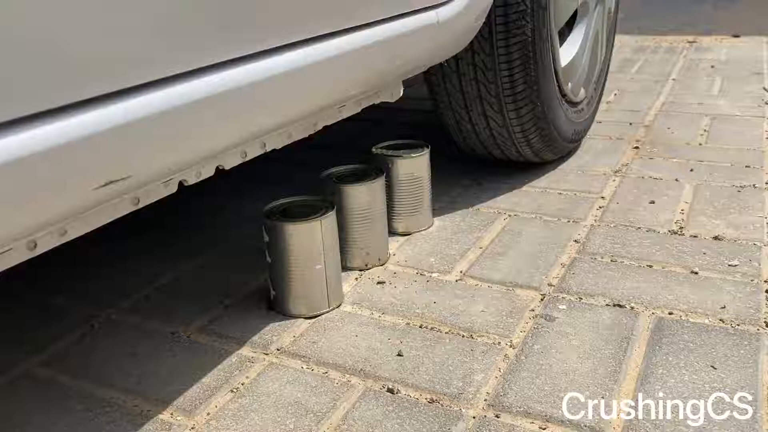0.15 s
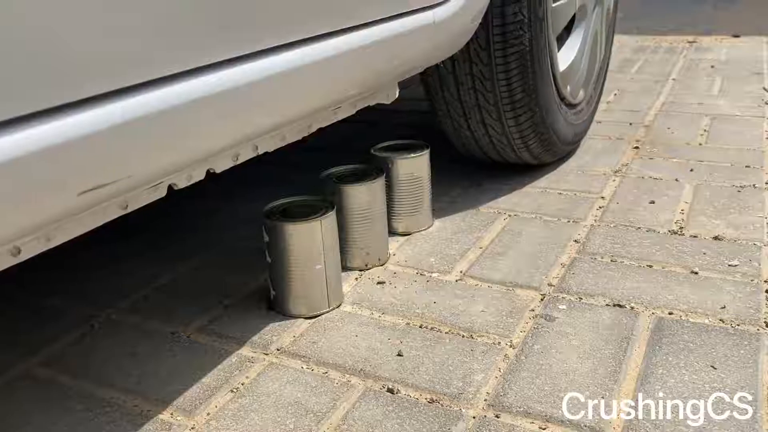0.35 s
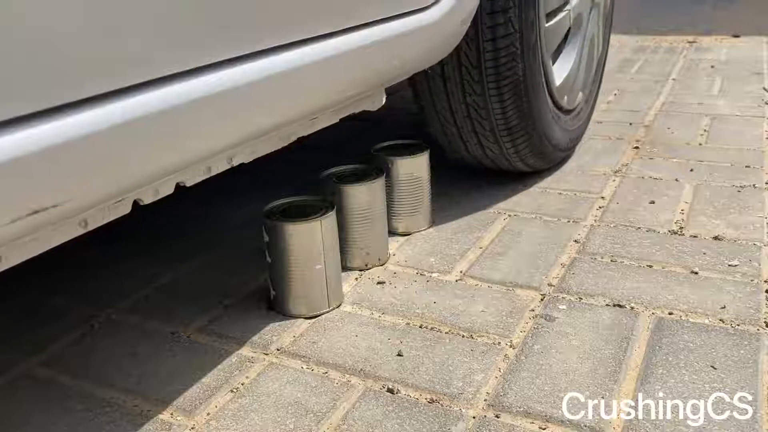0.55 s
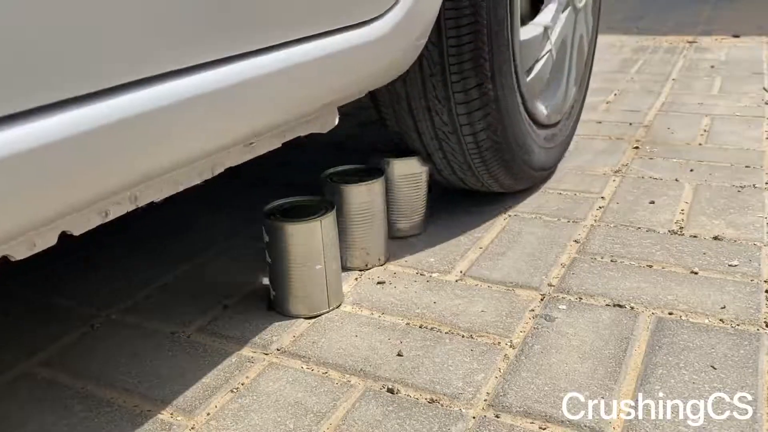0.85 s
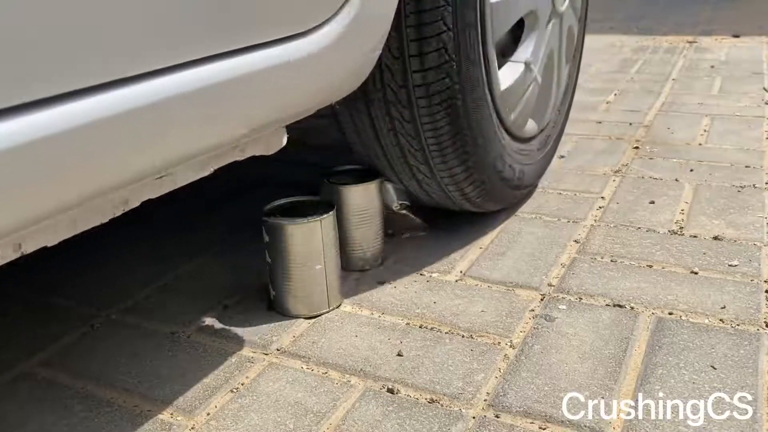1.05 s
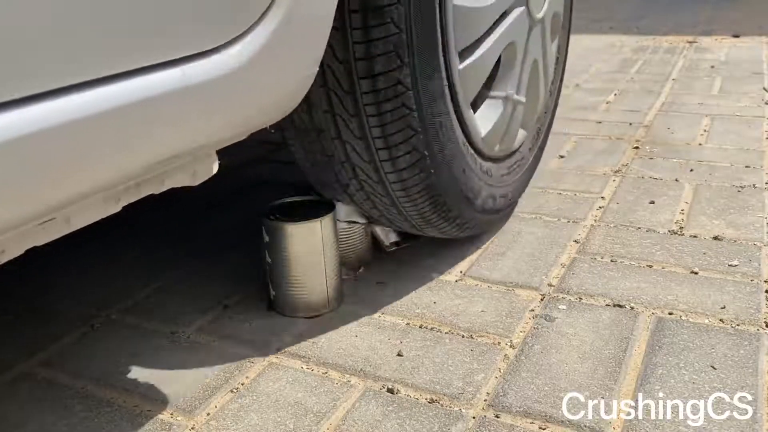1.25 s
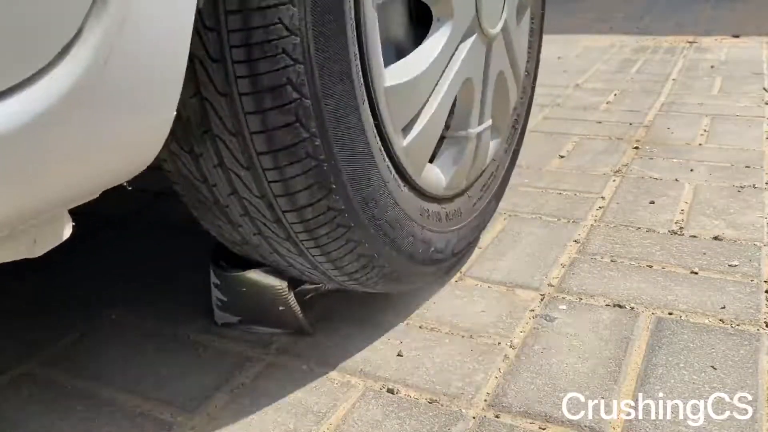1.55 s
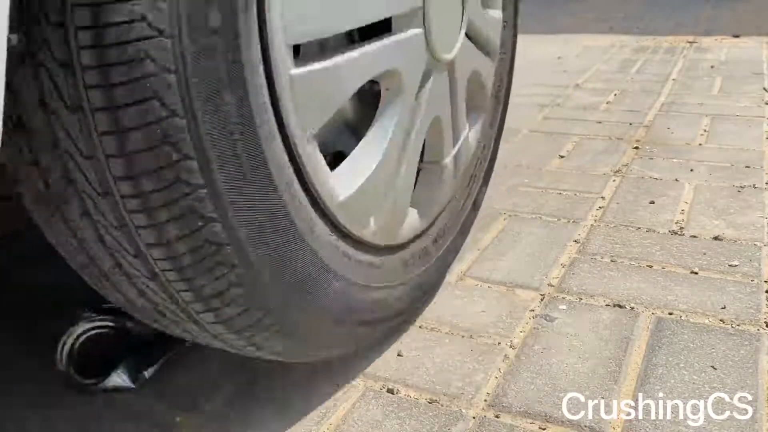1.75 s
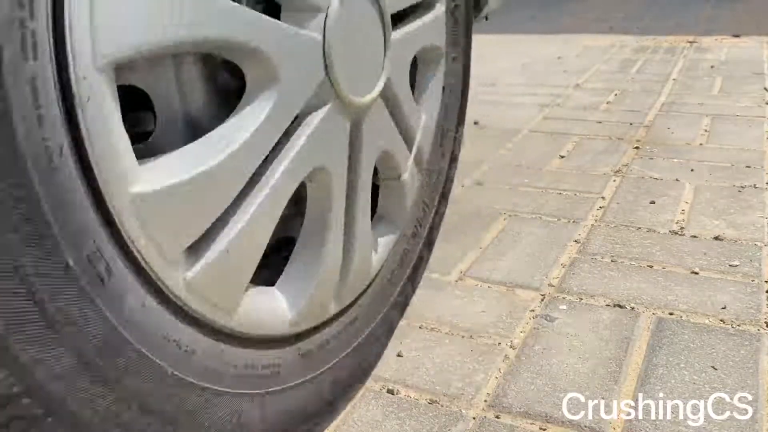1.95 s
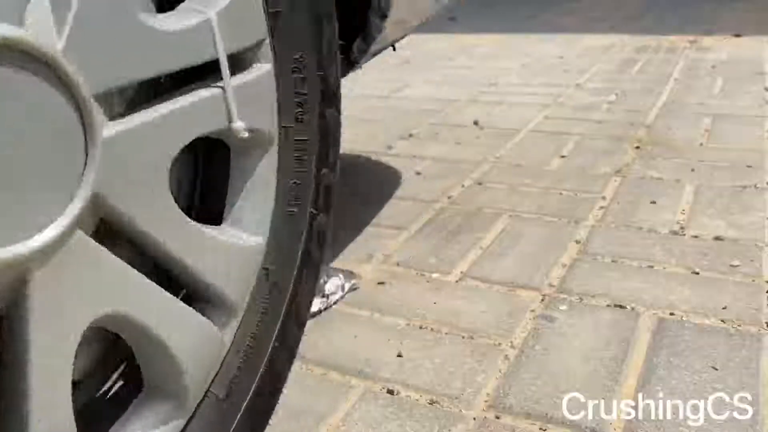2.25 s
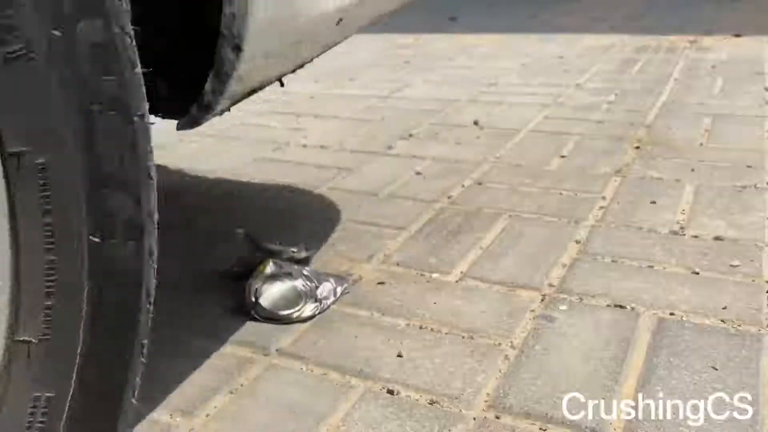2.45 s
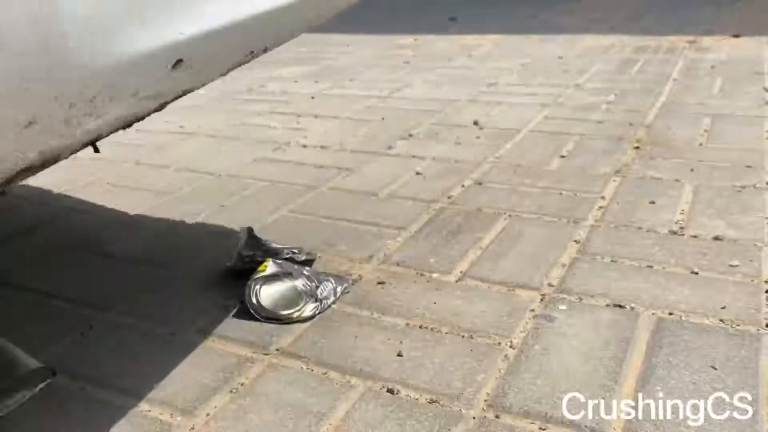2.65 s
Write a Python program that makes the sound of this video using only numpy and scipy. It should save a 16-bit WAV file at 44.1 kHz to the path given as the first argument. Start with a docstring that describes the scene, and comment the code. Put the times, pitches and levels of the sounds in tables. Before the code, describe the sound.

Close, dry outdoor stereo pickup of metal cans flattened under a tyre: engine rumble first, two hollow cracks, crackling crumple in two surges, brief metal groan, then small slaps and rattles as the rumble recedes.

```python
"""Empty tins crack, crunch, groan and clatter under a creeping car's tyre, over rumble that moves away.
Two collapse with a noise crack and a falling sine thump; snapping folds are struck modes and noise puffs.
Random grains ringing a shell make the crumpling, fluttering partials the groan, filtered noise the boom.
Flattened tins slap the paving as struck modes; the car is shaped noise and a wavering hum.
A short tail of decaying noise adds echoes, and a two-port microphone colours the whole."""
import sys
import numpy as np
from scipy import signal
from scipy.fft import rfft, irfft
from scipy.io import wavfile
from scipy.ndimage import uniform_filter1d

SR = 44100
rng = np.random.default_rng(int(sys.argv[2]) if len(sys.argv) > 2 else 0)


def unload_wav(signal):
    """Save mono or channel-first audio to the path in sys.argv[1] as 16-bit WAV at rate SR, clipped to [-1, 1]."""
    wavfile.write(
        sys.argv[1],
        SR,
        np.round(np.clip(np.atleast_2d(signal).T, -1, 1) * 32767).astype(np.int16),
    )


N = 123479
TIME_S = np.arange(N) / SR

# Low thud of a struck panel: (frequency [Hz], density [dB per Hz])
KNOCK_SPECTRUM = [(100, -31), (300, -11), (550, -1.5), (1100, 4.5), (1600, -5.5), (2600, -34), (6000, -64)]
# Mid-treble snap of sheet metal: (frequency [Hz], density [dB per Hz])
SNAP_SPECTRUM = [(600, -13), (1500, 1), (2500, 3), (3600, 0), (5500, -40), (12000, -68)]
# High fizz of sheet metal: (frequency [Hz], density [dB per Hz])
FIZZ_SPECTRUM = [(2000, -52), (4200, 0.5), (6000, 1), (8000, -1.5), (11000, -9), (16000, -17)]


def amp(db):
    """Decibels to gain."""
    return 10 ** (np.asarray(db) / 20)


def unit(x):
    """Scales to an rms of 1."""
    return x / np.sqrt(np.mean(x ** 2) + 1e-20)


def read(points, hz):
    """Interpolates a table along a log-frequency axis."""
    f, value = np.transpose(points)
    return np.interp(np.log(hz + 1), np.log(f + 1), value)


def curve(rows):
    """Interpolates every column of a timed table, sample by sample."""
    time_s, *columns = np.transpose(rows)
    return [np.interp(TIME_S, time_s, column) for column in columns]


def add(mix, time_s, sound):
    """Adds a stereo sound to the mix in place, cut at its end."""
    part = mix[:, round(time_s * SR):][:, :sound.shape[1]]
    part += sound[:, :part.shape[1]]


def pan(db):
    """Gains of the left and right port for a left-right difference."""
    return amp([[db / 2], [-db / 2]])


def colour(x, spectrum):
    """Gives two unrelated signals a spectrum and the likeness of the two ports; rms 1."""
    # Likeness of the ports: (frequency [Hz], correlation [-1 to 1])
    likeness = [(30, .72), (120, .76), (300, .84), (700, .9), (1400, .82), (3000, .58), (7000, .2),
                (15000, 0)]
    size = x.shape[1]
    hz = np.fft.rfftfreq(size, 1 / SR)
    left, other = rfft(x)
    same = np.clip(read(likeness, hz), -1, 1)
    right = same * left + np.sqrt(1 - same ** 2) * other
    return unit(irfft(np.array([left, right]) * amp(read(spectrum, hz)), size))


def noise(spectrum, size):
    """Coloured stereo noise."""
    return colour(rng.standard_normal((2, size)), spectrum)


def puff(t, spectrum, decay_s):
    """Noise burst with a quick attack and the energy of its envelope."""
    rise_s = 0.00073
    fade = np.minimum(t / rise_s, 1) * np.exp(-t / decay_s)
    return unit(noise(spectrum, len(t)) * fade) * np.sqrt(np.mean(fade ** 2))


def ring(t, modes):
    """Decaying modes (Hz, dB, t60), struck a little differently each time and out of step at the ports."""
    rise_s, hold_s = 0.0024, 0.004
    out = np.zeros((2, len(t)))
    for hz, db, t60_s in modes:
        size_db, skew_s = rng.standard_normal(2) * [1, 0.00008]
        turns = hz * (t + np.array([[0], [skew_s]])) + rng.random()
        decay_db = 60 * np.maximum(t - hold_s, 0) / max(t60_s, 0.005)
        out += amp(db + size_db - decay_db) * np.sin(2 * np.pi * turns)
    return out * np.minimum(t / rise_s, 1)


def wander(rate_hz):
    """Random drift of rms 1, band-limited to rate_hz."""
    band = np.fft.rfftfreq(N, 1 / SR) < rate_hz
    return unit(irfft(rfft(rng.standard_normal(N)) * band, N))


def burst(crack_db, thump_db, sweep_hz, fall_s):
    """A tin collapses: a crack, and a gulp of air that dives in pitch to a thump."""
    # Crack of the tin: (frequency [Hz], density [dB per Hz])
    crack_spectrum = [(100, 3), (400, 6), (1000, 4.5), (2500, 0.5), (5000, -4.5), (8000, -7.5),
                      (11000, -13), (16000, -22)]
    crack_rise_s, crack_hold_s, crack_decay_s = 0.00035, 0.0051, 0.0045
    thump_hz, thump_rise_s, thump_decay_s = 108, 0.0057, 0.014
    t = np.arange(SR // 5) / SR
    crack = noise(crack_spectrum, len(t)) * np.minimum(t / crack_rise_s, 1)
    crack *= np.exp(-np.maximum(t - crack_hold_s, 0) / crack_decay_s)
    turns = np.cumsum(thump_hz + sweep_hz * np.exp(-t / fall_s)) / SR
    thump = np.sin(2 * np.pi * turns) * np.minimum(t / thump_rise_s, 1)
    thump *= np.exp(-np.maximum(t - thump_rise_s, 0) / thump_decay_s)
    return amp(crack_db) * crack + amp(thump_db) * thump


def fold(ring_db, hz, snap_db, fizz_db, side_db, t60_s):
    """One fold snaps through and rings the panel beside it."""
    # Panel modes: (multiple of the fold's pitch [ratio], level [dB], share of its t60 [ratio])
    fold_modes = [(.62, -13, .7), (.81, -12, .7), (1, 0, 1.25), (1.23, -12, .7), (1.47, -14, .9),
                  (2.06, -20, 1.1), (2.55, -21, 1.4), (2.97, -21, 1.6)]
    snap_decay_s, knock_decay_s = 0.0067, 0.006
    t = np.arange(SR // 6) / SR
    panel = ring(t, [(hz * k, db, t60_s * share) for k, db, share in fold_modes])
    body = amp(-6.5) * panel + amp(-8) * puff(t, KNOCK_SPECTRUM, knock_decay_s)
    edge = amp(snap_db - 0.5) * puff(t, SNAP_SPECTRUM, snap_decay_s)
    edge += amp(fizz_db + 2) * puff(t, FIZZ_SPECTRUM, snap_decay_s)
    return pan(side_db) * (amp(ring_db) * body + edge)


def crumple():
    """A stream of tiny creases of uneven size, which also rings the shell."""
    # Fine crumpling under the tread: (time [s], body gain [dB], treble gain [dB])
    crumple_levels = [(.72, -65, -75), (.727, -44, -71), (.75, -53, -71), (.85, -46, -54), (.955, -59, -70),
                      (.99, -36.5, -43), (1.04, -62, -51), (1.09, -39.5, -50.5), (1.12, -43, -47),
                      (1.2, -46, -49.5), (1.30, -51.5, -57), (1.335, -35, -31), (1.375, -31.5, -31),
                      (1.405, -28.5, -31), (1.435, -28.5, -30), (1.47, -37.5, -41), (1.54, -72, -70),
                      (1.62, -57, -53), (1.66, -37, -45.5), (1.70, -31.5, -35), (1.745, -32.5, -37),
                      (1.79, -41, -47), (1.87, -53, -56), (1.95, -44, -50.5), (2.08, -55, -57.5),
                      (2.13, -49, -66), (2.36, -53.5, -74), (2.40, -33, -51), (2.44, -59, -82),
                      (2.49, -54, -80), (2.525, -64, -41.5), (2.56, -58, -53.5), (2.645, -49.5, -52.5),
                      (2.68, -62, -75)]
    # Body of the creases: (frequency [Hz], density [dB per Hz])
    body_spectrum = [(100, -45), (330, -36), (480, -9.5), (750, -4), (1150, -11), (1600, -13.5),
                     (2500, -24), (6000, -76)]
    # Treble of the creases: (frequency [Hz], density [dB per Hz])
    treble_spectrum = [(700, -51), (1600, -3.5), (2600, 1), (4000, 0.5), (6000, -7), (8000, -10),
                       (11000, -14.5), (16000, -25.5)]
    # Tin shell modes: (frequency [Hz], level [dB], t60 [s])
    shell_modes = [(659.4, 10, 0.14), (786, 2, 0.052), (920, -6, 0.25), (1200, -0.5, 0.06),
                   (1490, 10, 0.16), (1600, -17.5, 0.23), (1857, -6, 0.4), (2290, -9.5, 0.6),
                   (2860, -5, 0.13), (2966, 1, 0.45), (3904, 19, 0.05)]
    grains_per_s, grain_spread_db, energy_decay_s, shell_db = 1200, 4.3, 0.00029, -7
    body_db, treble_db = curve(crumple_levels)
    sizes = amp(grain_spread_db * np.minimum(rng.exponential(1, N), 3.5))
    sizes *= rng.random(N) < grains_per_s / SR
    energy = signal.lfilter([1], [1, -np.exp(-1 / (energy_decay_s * SR))], sizes ** 2)
    grit = np.sqrt(energy) * rng.standard_normal((2, N))
    creases = amp(body_db) * colour(grit, body_spectrum) + amp(treble_db) * colour(grit, treble_spectrum)
    creases *= TIME_S > crumple_levels[0][0]
    t = np.arange(SR // 5) / SR
    shell = signal.fftconvolve(creases, ring(t, shell_modes), axes=1)[:, :N]
    return pan(db=2.5) * (creases + amp(shell_db) * np.std(creases) * unit(shell))


def groan():
    """Friction keeps the bent wall singing; each partial flutters, and the pitch sinks as the tin flattens."""
    # Tin dragged under the tyre: (time [s], centre pitch [Hz], level [dB])
    groan_path = [(1.76, 834, -62), (1.80, 825.7, -43), (1.86, 834, -60), (1.885, 847, -40),
                  (1.92, 810, -58), (1.98, 823, -58.5), (2.005, 681, -41.5), (2.06, 687, -37),
                  (2.10, 669, -42), (2.14, 684, -62)]
    # Partials of the dragged tin: (multiple of its pitch [ratio], mean level [dB])
    groan_modes = [(.82, -12), (1, 0), (1.12, -9), (1.25, -9), (1.5, -6), (1.78, -18), (2.2, -15),
                   (3.1, -19)]
    flutter_db, pitch_wander = 4.5, 0.018
    hz, db = curve(groan_path)
    turns = np.cumsum(hz * (1 + pitch_wander * wander(rate_hz=70))) / SR
    tone = np.zeros(N)
    for k, mode_db in groan_modes:
        tone += amp(mode_db + flutter_db * wander(rate_hz=60)) * np.sin(2 * np.pi * k * turns)
    active = (TIME_S > groan_path[0][0]) * (TIME_S < groan_path[-1][0])
    return pan(db=4.5) * unit(tone) * amp(db) * active


def boom():
    """The air inside the buckling tins resounds until they are pressed flat."""
    # Hollow boom: (time [s], level [dB])
    boom_level = [(.86, -74), (.882, -21), (.93, -57), (1.0, -42), (1.14, -43), (1.16, -33), (1.21, -38.5),
                  (1.31, -48), (1.35, -37), (1.45, -41), (1.50, -42), (1.54, -65)]
    # Air in the tins: (frequency [Hz], density [dB per Hz])
    hollow_spectrum = [(150, -13), (250, -7), (314, 2.5), (370, -9), (470, -23), (700, -38)]
    active = (TIME_S > boom_level[0][0]) * (TIME_S < boom_level[-1][0])
    return amp(curve(boom_level)[0]) * noise(hollow_spectrum, N) * active


def bounce(ring_db, hz, snap_db, fizz_db, side_db):
    """A flattened tin slaps and scuffs the paving, ringing its modes and the struck panel."""
    # Flattened tin modes: (frequency [Hz], level [dB], t60 [s])
    flat_modes = [(498, 1, 0.1), (635, -2, 0.06), (699.3, -1.5, 0.2), (783, -3.5, 0.083), (953, 0.5, 0.061),
                  (986, 0, 0.083), (1088.5, -1, 0.13), (1320, -8, 0.072), (1640, -16, 0.14),
                  (1867, -15, 0.077), (2420, -9, .1), (2497, -20, 0.069), (2580, -18, .12),
                  (3010, -19, 0.065)]
    panel_db, panel_t60_s, decay_s = 0.5, 0.084, 0.0095
    t = np.arange(SR // 4) / SR
    body = amp(-11) * ring(t, [*flat_modes, (hz, panel_db, panel_t60_s)])
    body += amp(-18) * puff(t, KNOCK_SPECTRUM, decay_s)
    edge = amp(snap_db + 2) * puff(t, SNAP_SPECTRUM, decay_s)
    edge += amp(fizz_db + 3) * puff(t, FIZZ_SPECTRUM, decay_s)
    return pan(side_db) * (amp(ring_db) * body + edge)


def echoes(x):
    """A short, dense tail from the paving, wheel arch and underbody, different at each port."""
    # Decay of the tail: (frequency [Hz], t60 [s])
    echo_t60 = [(100, 0.14), (700, 0.1), (3000, 0.12), (8000, 0.12), (16000, 0.051)]
    rise_s = 0.0045
    hz, t, z = signal.stft(rng.standard_normal((2, SR // 2)), SR, nperseg=256)
    decay = amp(-60 * t / read(echo_t60, hz)[:, None])
    tail = signal.istft(z * decay, SR, nperseg=256)[1]
    tail *= np.minimum(np.arange(tail.shape[1]) / SR / rise_s, 1)
    return signal.fftconvolve(x, tail / np.linalg.norm(tail[0]), axes=1)[:, :N]


def steady(x):
    """Evens out the slow swells of a noise, as in the rumble of a governed engine."""
    evenness = 0.6  # 0 leaves the swells, 1 flattens them
    power = uniform_filter1d((x ** 2).mean(0), size=2000)
    return unit(x / (abs(power) + 1e-6) ** (evenness / 2))


def car():
    """Exhaust rumble, engine and tyre hiss pulsing at the firing rate, and a wavering hum."""
    # The car, passing: (time [s], rumble level [dB], hiss level [dB])
    car_levels = [(.12, -31.5, -42.5), (.62, -32.5, -43), (.73, -28.5, -43), (.84, -26, -44),
                  (.93, -36, -48.5), (1.08, -36.5, -44.5), (1.25, -33, -45), (1.45, -39, -32),
                  (1.6, -42, -60), (2.2, -46, -53), (2.52, -42, -54.5), (2.79, -42.5, -59)]
    # Exhaust rumble: (frequency [Hz], density [dB per Hz])
    rumble_spectrum = [(20, -56), (40, -4.5), (55, 2.5), (75, -0.5), (100, 1), (128, -4.5), (160, -10.5),
                       (220, -13.5), (320, -34), (700, -75.5)]
    # Engine and tyre hiss: (frequency [Hz], density [dB per Hz])
    hiss_spectrum = [(60, -22), (250, 2), (430, 1.5), (560, -5), (900, -4), (1600, -11), (3000, -13.5),
                     (6000, -23), (11000, -31), (16000, -41)]
    # Engine hum: (multiple of the firing rate [ratio], level relative to the hiss [dB])
    hum_modes = [(6, -19.5), (7, -16), (9, -12.5), (10, -7), (11, -19), (14, -15)]
    firing_hz, rate_wander, hiss_pulse = 44.11, 0.0064, 0.067  # mean rate, rms share, depth
    start_s, fade_in_s = 0.1061, 0.0036
    rumble_db, hiss_db = curve(car_levels)
    turns = np.cumsum(firing_hz * (1 + rate_wander * wander(rate_hz=2.7))) / SR
    hum = np.zeros(N)
    for k, db in hum_modes:
        hum += amp(db) * np.sqrt(2) * np.sin(2 * np.pi * (round(k) * turns + rng.random()))
    hiss = noise(hiss_spectrum, N) * (1 + hiss_pulse * np.sin(2 * np.pi * turns))
    rumble = steady(noise(rumble_spectrum, N))
    fade_in = np.clip((TIME_S - start_s) / fade_in_s, 0, 1)
    return (amp(rumble_db) * rumble + amp(hiss_db) * (hiss + hum)) * fade_in


def scene():
    """The tins with their echoes, over the car."""
    # Tins giving way: (time [s], crack level [dB], thump level [dB],
    # starting pitch above the thump [Hz], pitch fall time constant [s])
    bursts = [(.872, -17, -14.5, 1435, 0.00286), (1.149, -18, -14.5, 1522, .0034)]
    # Folds snapping into the tin wall, levels before fold()'s trims: (time [s], ring level [dB],
    # ring pitch [Hz], snap level [dB], fizz level [dB], left-right [dB], t60 before mode shares [s])
    folds = [(0.858, -31.5, 837, -37, -51, -4, 0.095), (0.961, -22.5, 940, -36, -47, -1, 0.018),
             (0.97, -21, 1064, -26, -33.5, 1, 0.021), (0.988, -23, 1366, -42, -44, -9, 0.055),
             (0.995, -23, 1283, -35, -34.5, 1.5, 0.032), (1.008, -28, 1032, -39, -40, 2.5, 0.029),
             (1.024, -20, 1330, -48, -46, -3, 0.021), (1.049, -25.5, 950, -34, -38.5, 1, 0.021),
             (1.063, -26, 940, -30.5, -44, -2.5, 0.033), (1.111, -18.5, 1560, -55, -39.5, -1, 0.018),
             (1.121, -24, 860, -41, -50, 0, 0.026), (1.141, -22, 746, -28, -62, -3, 0.031),
             (1.202, -31, 1565, -39, -35.5, -1, 0.055), (1.223, -19, 1274, -28, -45, 0, 0.018),
             (1.228, -23, 1353, -36, -46, 2.5, 0.044), (1.254, -26, 472, -34, -41, 1, 0.026),
             (1.31, -22, 1428, -38, -56, 1, 0.055), (1.319, -22.5, 1502, -31, -42, -4, 0.062),
             (1.331, -14, 814, -25.5, -52, 5, 0.14), (1.338, -14, 780, -25, -32, 0, 0.099),
             (1.352, -40, 760, -23, -37, -7, 0.037), (1.366, -28, 843, -19, -25.5, 1, 0.055),
             (1.389, -18, 816, -30, -28.5, -0.5, 0.055), (1.414, -14, 665, -31, -28, 2.5, 0.019),
             (1.431, -27, 910, -26, -27, -8, 0.024), (1.441, -9, 669, -49, -24, 0.5, 0.053),
             (1.481, -14.5, 528, -32, -29.5, 2.5, 0.06), (1.511, -23, 552, -35.5, -33.5, 2.5, 0.028),
             (1.557, -20.5, 610, -31.5, -38, 0.5, 0.03), (1.624, -47, 587, -49, -37, 2, 0.055),
             (1.635, -19.5, 622, -38, -47, -1, 0.055), (1.654, -17.5, 1180, -27.5, -32.5, 4, 0.05),
             (1.674, -24, 716, -46, -53, -4, 0.061), (1.685, -22, 1140, -23, -24, 3.5, 0.064),
             (1.696, -10, 938, -28, -34, 3, 0.034), (1.712, -12.5, 846, -52, -35, 2.5, 0.055),
             (1.719, -21.5, 897, -39, -35, 5, 0.079), (1.731, -18, 860, -29, -28, 5.5, 0.049),
             (1.734, -23, 1090, -27, -46, 4, 0.045), (1.757, -15.5, 814, -37, -33.5, 3, 0.069),
             (1.805, -26.5, 836, -58, -48, 5.5, 0.055), (1.831, -33, 896, -59, -40.5, 2, 0.055),
             (1.879, -30, 821, -68, -58, 8, 0.066), (1.919, -33.5, 874, -48, -46, 3, 0.16)]
    # Flattened tins bouncing on the paving, levels before bounce()'s trims: (time [s], ring level [dB],
    # struck panel pitch [Hz], snap level [dB], fizz level [dB], left-right [dB])
    bounces = [(2.147, -30.5, 965, -42, -55.5, 1.5), (2.212, -26.5, 826, -43.5, -54.5, 0.5),
               (2.261, -27, 990, -35, -40, -3), (2.268, -27, 1118, -37, -46, 2),
               (2.349, -25, 1079, -38.5, -40.5, 1.5), (2.389, -32, 1030, -34, -43.5, 2),
               (2.402, -23, 935, -35.5, -52, 0), (2.409, -32, 786, -39, -48.5, 2),
               (2.454, -28, 956, -42, -47, 2), (2.495, -30, 980, -36, -45, 1.5),
               (2.526, -29, 988, -37.5, -63, 3), (2.56, -33.5, 1080, -39.5, -74, 4.5),
               (2.617, -37, 816, -44, -55, 6.5)]
    tins = crumple() + boom() + groan()
    for table, source in (bursts, burst), (folds, fold), (bounces, bounce):
        for time_s, *row in table:
            add(tins, time_s, source(*row))
    echo_db = -8
    return tins + amp(echo_db) * echoes(tins) + car()


def record(dry):
    """Microphone colour with two treble notches, port balance and phase, soft overload, and the band limit."""
    # Port balance: (frequency [Hz], left-right [dB])
    balance = [(60, -0.044), (200, 0.042), (700, 1.7), (2400, -0.12), (4400, 4.1), (8000, -0.5),
               (15000, -2.4)]
    # Phase lead of the left port over the right: (frequency [Hz], phase [rad])
    port_phase = [(30, -1.5), (300, 1.1), (800, 1), (2500, 1.43), (4000, 1.86), (7000, 1), (12000, 2.5)]
    # Microphone response: (frequency [Hz], gain [dB])
    mic_response = [(25, -5.5), (45, -4.5), (70, -2), (5000, -2.5), (7300, -4), (8400, -11), (9600, -1),
                    (12000, 0.5), (13600, -15), (15000, 4.5), (16000, -13)]
    ceiling, edge_hz = 0.3, 16300  # full scale = 1
    hz = np.fft.rfftfreq(2 * N, 1 / SR)
    port = amp(read(balance, hz) / 2) * np.exp(0.5j * read(port_phase, hz))
    spectrum = rfft(dry, 2 * N) * amp(read(mic_response, hz)) * np.array([port, 1 / port])
    heard = irfft(spectrum)[:, :N]
    heard = heard / (1 + (heard / ceiling) ** 4) ** 0.25
    lowpass = signal.firwin(511, edge_hz, window=("kaiser", 9), fs=SR)
    return signal.oaconvolve(heard, lowpass[None], "same")


dry = scene()
out = record(dry)
unload_wav(out)
```